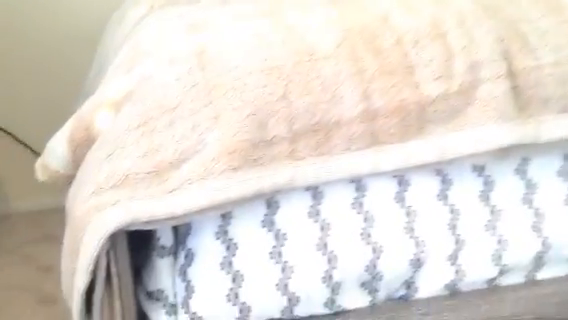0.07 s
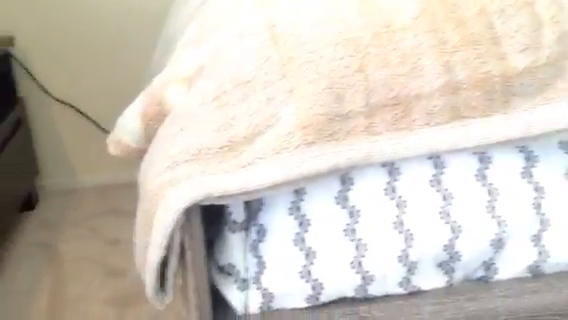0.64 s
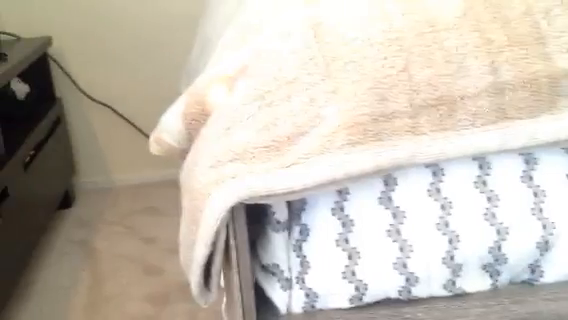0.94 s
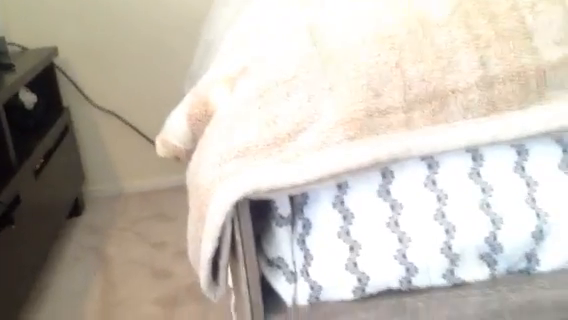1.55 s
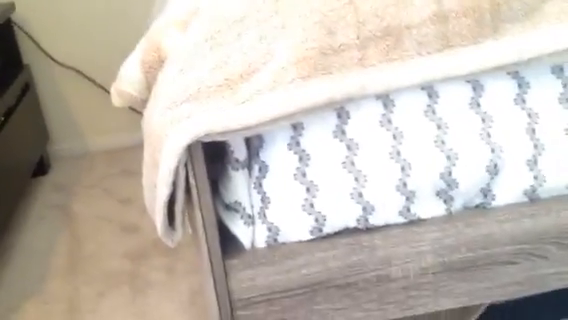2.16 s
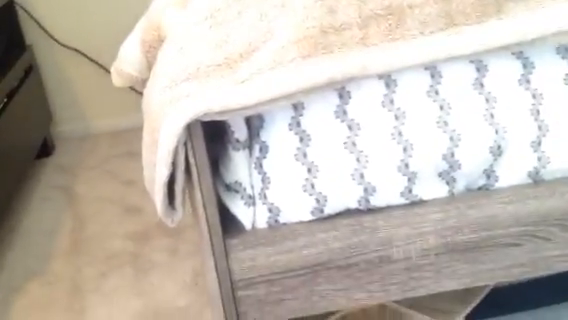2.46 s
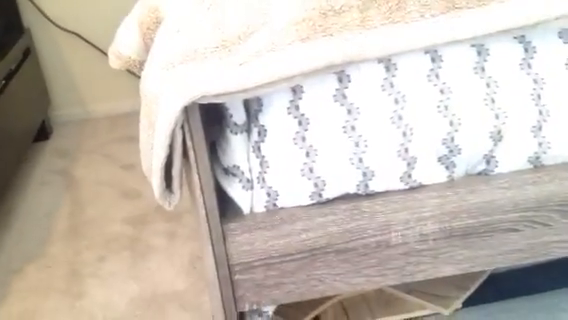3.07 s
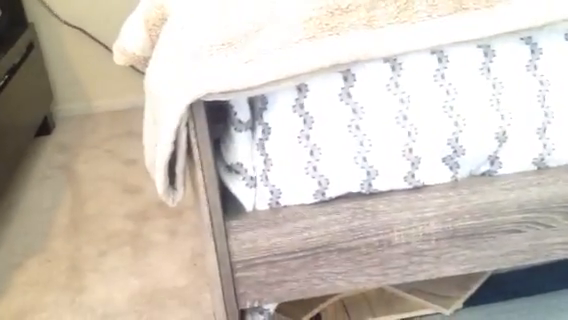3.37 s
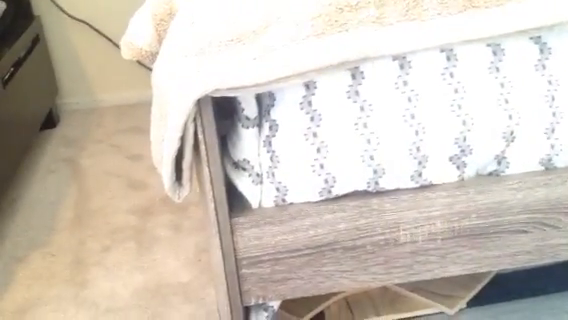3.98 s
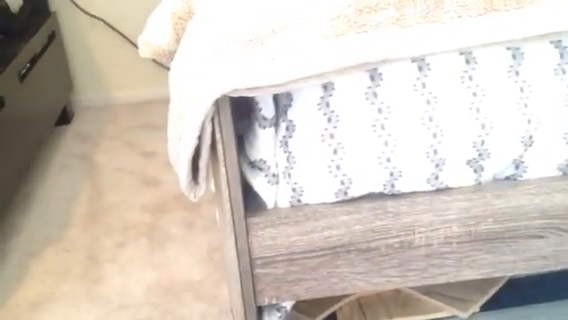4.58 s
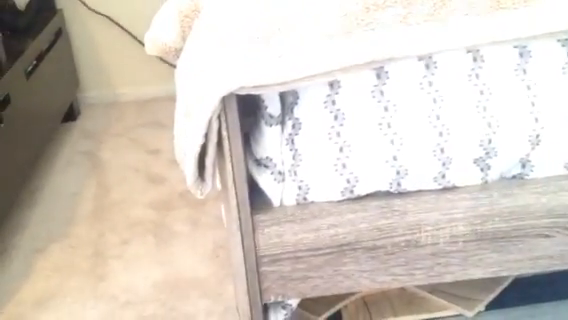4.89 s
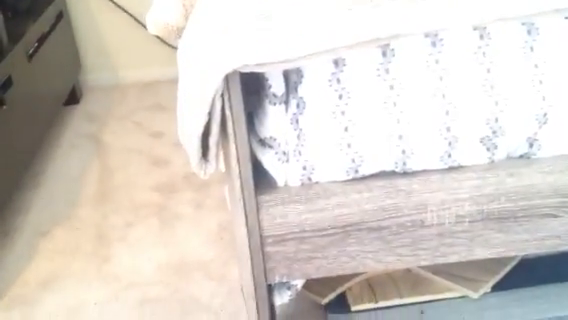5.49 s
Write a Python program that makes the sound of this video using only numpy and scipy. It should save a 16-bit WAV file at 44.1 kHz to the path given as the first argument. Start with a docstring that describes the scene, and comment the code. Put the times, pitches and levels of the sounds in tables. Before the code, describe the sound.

A hand shifts its grip on a phone in a quiet, carpeted bedroom, heard through the phone's own microphone. Soft fingertip thumps and light ticks come first. About two seconds in, a faint squeaky slide runs into one hard knock that chatters, scrapes and rings briefly. Another firm tap follows, then scattered lighter taps and slow rubbing over a faint, steady hiss.

```python
"""A hand handles a phone, heard through the phone's own microphone in a quiet, carpeted bedroom.
Skin sticks and slips over the hollow case in slow strokes, fingertips thump it, and the shell ticks.
One slide squeaks and rasps into a hard knock that chatters, scrapes on and leaves a hollow ring.
Under it all lies a steady bed of room tone and microphone hiss."""
import sys
import numpy as np
from scipy import signal
from scipy.fft import rfft, irfft
from scipy.io import wavfile

SR = 44100
rng = np.random.default_rng(int(sys.argv[2]) if len(sys.argv) > 2 else 0)


def persist_wave(psi):
    """Save psi, clipped to +-1, as 16-bit WAV."""
    counts = np.round(np.clip(psi, -1, 1) * 32767).astype(np.int16)
    wavfile.write(sys.argv[1], SR, np.atleast_2d(counts).T)


N = 244487
TIME = np.arange(N) / SR

# fingertip taps on the case
# (time [s], level [dB], pitch [Hz], swell [s], relative skin noise [dB], nail tick before trim [dB])
TAPS = [(0.4161, -34.5, 516, 0.0047, -11, -55.5), (0.433, -45, 320, 0.0058, 4, -63),
        (0.671, -52, 312, 0.0027, -8.5, -70), (0.7246, -41.5, 528, 0.0073, -7, -58),
        (0.8732, -35.5, 498, 0.0035, -13, -55), (0.971, -50, 343, 0.0029, -16, -80),
        (1.0179, -36, 450, 0.003, -11.5, -48), (1.1822, -39.5, 474, 0.0031, -11.5, -53),
        (1.2297, -34, 479, 0.0039, -16, -48), (1.239, -42, 466, 0.0078, -15, -56),
        (1.384, -55.5, 333, 0.0025, -16, -80), (1.5183, -41.5, 477.5, 0.009, 1, -36),
        (2.185, -28.5, 478, 0.0047, -9, -60), (2.226, -42, 496, 0.02, 6, -60),
        (2.5807, -25.5, 511, 0.0025, -18.5, -57), (2.5885, -31, 454, 0.0026, -24, -67),
        (2.732, -44.5, 502, 0.0071, -11, -72), (2.845, -40.5, 527, 0.0028, -22.5, -77),
        (2.915, -54.5, 794, 0.0072, 0.5, -56), (3.11, -55, 497, 0.005, -3, -59),
        (3.4474, -35, 548, .0078, -20, -56), (3.763, -48.5, 408, 0.0026, -2, -55),
        (4.411, -49, 564, 0.0032, -13, -66), (4.620, -40, 516, .005, -13, -70.5),
        (4.7688, -48, 536, 0.0031, -5.5, -50), (4.780, -41.5, 483, 0.0036, -6, -48),
        (4.949, -50, 555, 0.0076, -8.5, -51.5)]


def from_db(db):
    """Decibels to gain."""
    return 10 ** (np.asarray(db) / 20)


def response(colour, peaks=(), size=8192):
    """Unit-energy impulse response from an EQ curve and peaks (centre [Hz], width [Hz], boost [dB])."""
    hz = np.maximum(np.fft.rfftfreq(size, 1 / SR), 1)
    colour_hz, colour_db = np.transpose(colour)
    db = np.interp(np.log(hz), np.log(colour_hz), colour_db)
    for centre, width, boost in peaks:
        db = db + boost / (1 + (2 * (hz - centre) / width) ** 2)
    cepstrum = irfft(np.log(from_db(db)))[:size // 2]
    cepstrum[1:] *= 2   # minimum phase keeps attacks sharp
    impulse = irfft(np.exp(rfft(cepstrum, size)))[:size // 2]
    return impulse / np.linalg.norm(impulse)


def through(x, impulse):
    """Play x through an impulse response."""
    return signal.fftconvolve(x, impulse)[:len(x)]


def band(x, edges_hz, kind, order=2):
    """Butterworth filter."""
    return signal.sosfilt(signal.butter(order, edges_hz, kind, fs=SR, output="sos"), x)


def rms_one(x):
    """Scale to unit level."""
    return x / np.sqrt(np.mean(x ** 2) + 1e-20)


def add(track, s, sound):
    """Mix a sound in at time s."""
    start = round(s * SR)
    track[start:start + len(sound)] += sound[:N - start]


def burst(t60):
    """Half a second of noise that starts at once and dies away."""
    t = TIME[:SR // 2]
    return rng.standard_normal(len(t)) * from_db(-60 * t / t60)


def room_tone(level_db):
    """The room and the microphone's own hiss make a steady bed of coloured noise."""
    # EQ of the bed (frequency [Hz], level [dB])
    colour = [(15, -40), (25, -20), (37, -28.5), (91, -10), (129, -0.5), (245, 2), (989, -5.5),
              (1070, -10.5), (1190, -7), (1690, -9.5), (2040, -8.5), (4220, -11.5), (8030, -13),
              (8710, -21), (15300, -13.5)]
    return from_db(level_db) * through(rng.standard_normal(N), response(colour))


def rubbing(slips_per_s, slip_spread_db, smooth_share, grip_width_hz, grip_boost_db, band_trims_db):
    """Skin sticks and slips in tiny jerks that sound through the case and grip, in swelling strokes."""
    # strokes of the hand, levels before the band trims (firmest moment [s], swell [s], fade [s],
    # low drag [dB], hollow body [dB], friction hiss [dB], grip resonance [Hz])
    strokes = [(0.14, 0.058, 0.15, -90, -72, -71.5, 480), (0.295, 0.046, 0.063, -67, -74, -69, 293),
               (1.486, 0.025, 0.053, -61.5, -60.5, -59.5, 2430), (1.59, 0.034, 0.11, -63, -70, -87, 505),
               (1.74, 0.1, 0.096, -65.5, -65, -61.5, 808), (1.88, 0.037, 0.094, -53.5, -80, -81, 232),
               (1.97, 0.089, 0.11, -70, -65, -59.5, 1040), (2.11, 0.13, 0.26, -66, -60.5, -59, 1070),
               (2.345, 0.1, 0.071, -54, -45, -41.5, 1366), (2.47, 0.1, 0.086, -54.5, -55, -59.5, 418),
               (2.71, 0.17, 0.16, -65, -52.5, -63, 558), (2.851, 0.14, 0.11, -60, -61, -78.5, 450),
               (3.35, 0.18, 0.15, -63, -57.5, -68, 540), (3.66, 0.084, .1, -72, -66.5, -77.5, 542),
               (3.87, 0.091, 0.066, -54, -49, -65, 555), (4.425, 0.012, 0.2, -66.5, -55, -67.5, 590),
               (4.585, 0.096, 0.089, -60, -46, -57.5, 1000), (4.999, 0.072, 0.21, -73.5, -61.5, -84, 500),
               (5.25, 0.17, 0.12, -82, -53.5, -60, 835)]
    # EQ of the friction (frequency [Hz], level [dB])
    colour = [(40, -62.5), (180, -26.5), (230, -7.5), (340, -9), (520, -3), (600, -7.5), (670, -17.5),
              (1000, -13), (1300, -23), (2000, -20), (3400, -25), (4400, -23.5), (8700, -28.5),
              (12000, -49)]
    # resonances of the case (centre [Hz], width [Hz], boost [dB])
    case_peaks = [(231, 28, 10), (281, 26, 9), (425, 30, 10), (447, 6.6, 2), (507.4, 16, 8.5),
                  (550.6, 20, 8), (602, 110, 10), (767, 36, 8), (825.5, 32, 13), (1145, 13, 12),
                  (1360, 31, 11.5), (1530, 83, 9), (1638, 37, 10.5), (1960, 41, 3.5), (2046, 50, 7),
                  (2226, 45, 7), (2540, 70, 9.5), (4440, 760, 7)]
    edge_db, roundness = -10.5, 1.56   # level one swell before or one fade after the peak; 1 = pointed
    out, t = np.zeros(N), TIME[:SR]
    for s, swell, fade, *levels, grip_hz in strokes:
        slips = (rng.random(SR) < slips_per_s / SR) * rng.choice([-1, 1], SR)
        slip_sizes = from_db(slip_spread_db * np.minimum(rng.exponential(1, SR), 4))
        slips = rms_one(slips * slip_sizes)
        waver_db = 0.5 * rms_one(band(rng.standard_normal(SR), 45, "low"))   # pressure is never even
        friction = from_db(waver_db) * (slips + smooth_share * rng.standard_normal(SR))
        cavity = response(colour, case_peaks + [(grip_hz, grip_width_hz, grip_boost_db)])
        rub = through(friction, cavity)
        drag = band(rub, 350, "low", order=4)
        body = band(rub, [350, 1300], "band", order=3)
        hiss = band(rub, 1300, "high", order=4)
        start = max(s - 0.5, 0)
        from_peak = start + t - s
        pressure = from_db(edge_db * np.maximum(-from_peak / swell, from_peak / fade) ** roundness)
        for part, level, trim in zip((drag, body, hiss), levels, band_trims_db):
            add(out, start, pressure * from_db(level + trim) * rms_one(part))
    return out


def shell_ticks(trim_db, width_share):
    """The shell slips, alone or under a nail: a sudden crackle with one resonance set by the spot."""
    # lone ticks (time [s], level before trim [dB], pitch [Hz], t60 [s], resonance boost [dB])
    ticks = [(0.4308, -41, 4140, 0.02, 16), (0.671, -42, 8500, 0.012, 25), (0.738, -53, 4900, 0.17, 6),
             (2.6368, -39.5, 2380, 0.027, 8), (2.9112, -47, 1520, 0.078, 20.5),
             (3.2375, -52.5, 4100, 0.027, 0), (3.38, -55, 8000, 0.03, 16),
             (3.665, -59.5, 4640, 0.069, 18.5), (3.666, -54, 10200, .033, 27), (3.872, -47.5, 2880, .03, 1)]
    colour = [(60, -15.5), (300, -9.5), (1000, -2.5), (2200, 3), (3200, -3), (4500, 5), (6000, -9.5),
              (8700, -6), (10200, -28), (15000, -36.5)]   # (frequency [Hz], level [dB])
    lone_swell_s, nail_swell_s = 0.001, 0.0023
    nail_lead_s, nail_hz, nail_t60, nail_boost_db = 0.0056, 1900, 0.042, 4   # nail lands before the pad
    lone = [(*tick, lone_swell_s) for tick in ticks]
    nails = [(s - nail_lead_s, db, nail_hz, nail_t60, nail_boost_db, nail_swell_s) for s, *_, db in TAPS]
    out, t = np.zeros(N), TIME[:SR // 2]
    for s, db, hz, t60, boost_db, swell in lone + nails:
        envelope = np.minimum(t / swell, 1) * from_db(-60 * np.maximum(t - swell, 0) / t60)
        crackle = envelope * rng.standard_normal(len(t))
        spot = response(colour, [(hz, width_share * hz, boost_db)])
        add(out, s, from_db(db + trim_db) * through(crackle, spot))
    return band(out, 150, "high")


def bedroom(x, t60, first_wall_s):
    """Dense reflections of a small, soft room."""
    # EQ of the reflections (frequency [Hz], level [dB])
    colour = [(100, -8.5), (200, 5), (300, 7), (370, 2.5), (450, 2), (560, -4.5), (800, 2), (2000, -2.5),
              (5000, -6), (8500, -7.5), (12000, -5.5)]
    reflections = burst(t60) * (TIME[:SR // 2] > first_wall_s)
    tail = through(reflections, response(colour))
    return through(x, tail / np.linalg.norm(tail))


def fingertip_thumps(skin_t60, skin_trim_db):
    """A soft fingertip loads the case gradually, so its air cavity swells briefly; then the pad settles."""
    # EQ of the skin contact (frequency [Hz], level [dB])
    skin_colour = [(60, -38), (130, -19.5), (220, -4), (310, 3.5), (380, 0.5), (520, 3.5), (680, -9.5),
                   (800, 1), (880, -10.5), (960, -4), (1250, -12), (1900, -15), (3000, -24.5),
                   (12000, -46.5)]
    settle_delay_s, settle_db, settle_ratio = 0.01278, -16.5, 0.62   # a weaker, deeper bump
    out, t = np.zeros(N), TIME[:SR // 2]
    skin = response(skin_colour)

    def cavity(hz, swell):
        """A few cycles that swell and stop."""
        return (t / swell * np.exp(1 - t / swell)) ** 2 * np.sin(2 * np.pi * hz * t)

    for s, db, hz, swell, skin_db, _ in TAPS:
        scuff = from_db(skin_db + skin_trim_db) * through(burst(skin_t60), skin)
        add(out, s, from_db(db) * (cavity(hz, swell) + scuff))
        add(out, s + settle_delay_s, from_db(db + settle_db) * cavity(settle_ratio * hz, swell=0.004))
    return band(out, 120, "high", order=4)


def slide(start_s, firm_s, end_s, squeak_hz, sag_hz_per_s, ragged_hz):
    """Pressed skin gives a faint, ragged, slowly falling squeak while the shell rasps ever louder."""
    pitch = squeak_hz - sag_hz_per_s * np.clip(TIME - start_s, 0, 1)
    phase = 2 * np.pi * np.cumsum(pitch) / SR
    flutter = band(rng.standard_normal((2, N)), ragged_hz, "low")
    squeak = rms_one(flutter[0] * np.cos(phase) + flutter[1] * np.sin(phase))
    colour = [(60, -47), (500, -2), (1300, -20), (2300, 3), (3400, -5), (4400, -0.5), (6500, -7.5),
              (8000, -2.5), (10200, -24.5), (15000, -15)]   # (frequency [Hz], level [dB])
    rasp = through(rng.standard_normal(N), response(colour, peaks=[(4270, 510, 12)]))
    squeak_db = np.interp(TIME, [start_s, firm_s], [-66.5, -61])
    rasp_db = np.interp(TIME, [start_s, firm_s], [-95, -53])
    touching = np.clip(np.minimum(TIME - start_s, end_s - TIME) / 0.0046, 0, 1)
    return touching * (from_db(squeak_db) * squeak + from_db(rasp_db) * rasp)


def knock():
    """One hard contact on the shell, then smaller rebounds, the last with a fine hiss."""
    # the hit and its chatter (time [s], level [dB], t60 [s], relative top hiss [dB])
    contacts = [(2.1825, -18, 0.022, -19), (2.1878, -27.5, 0.039, -22), (2.1921, -25, 0.021, -23.5),
                (2.2135, -34, 0.02, -25.5), (2.2204, -34, 0.087, -25.5), (2.235, -37.5, 0.22, -2)]
    # EQ of the struck shell (frequency [Hz], level [dB])
    colour = [(60, -45.5), (125, -8.5), (250, -12.5), (480, 3), (720, -6.5), (950, -3), (1270, -11.5),
              (1900, 1), (3200, -8), (4700, 1), (5600, -8), (7000, -7), (10300, -29.5), (15000, -37.5)]
    # resonances of the struck shell (centre [Hz], width [Hz], boost [dB])
    peaks = [(1980, 150, 1), (2728, 34, 2), (4550, 80, -3.5), (4630, 97, 11), (4880, 140, -1),
             (6435, 500, 2)]
    out, shell = np.zeros(N), response(colour, peaks)
    for s, db, t60, hiss_db in contacts:
        hiss = band(burst(t60), [9000, 13500], "band")
        clack = through(burst(t60), shell)
        add(out, s, from_db(db) * (clack + from_db(hiss_db) * hiss))
    return out


def shell_crack(s, rise_s):
    """The first hard contact sets the stiff shell ringing, bright and short."""
    # modes of the shell (frequency [Hz], level [dB], t60 [s])
    modes = [(1110, -33, 0.028), (2084, -27, .06), (2487, -29, 0.11), (4050, -26.5, 0.011),
             (4550, -15, .018), (5030, -23, .022), (5580, -19.5, .008), (6816, -18, 0.0056),
             (7800, -12.5, 0.0019), (8380, -21, 0.015), (9080, -20.5, 0.0084)]
    out, t = np.zeros(N), TIME[:SR // 4]
    for k, (hz, db, t60) in enumerate(modes):
        envelope = np.minimum(t / rise_s, 1) * from_db(db - 60 * t / t60)
        add(out, s, (-1) ** k * envelope * np.sin(2 * np.pi * hz * t))
    return out


def jolt(s, db, hz, decay_s):
    """The knock shakes the whole microphone in one slow wobble."""
    t = np.maximum(TIME - s, 0)
    return from_db(db) * np.sin(2 * np.pi * hz * t) * np.exp(-t / decay_s)


def hollow_ring(unevenness_db):
    """Each blow strikes the same long modes with strengths of its own; a heavy push favours the deepest."""
    # blows that start the ring (time [s], level [dB], extra on the deepest modes [dB], swell [s])
    blows = [(2.184, -39.5, -11.5, 0.0027), (2.227, -46, -0.5, 0.0039), (2.347, -44.5, 5.5, 0.0094),
             (2.791, -63.5, 15, 0.049)]
    # hollow modes (frequency [Hz], relative level [dB], t60 [s])
    modes = [(160.8, -14, 0.16), (228.8, 5.5, 0.39), (315, -18.5, 0.44), (416, -4.5, .25), (433, -7.5, 1.4),
             (440, -7.5, 0.21), (506, -7.5, 0.12), (559, 0.5, 0.45), (626, -5, 0.75), (770, -12, .7),
             (819, -11.5, .5), (1166, -11.5, .4), (1353, -11.5, 0.19), (1570, -11, 0.33), (1596, -4, 0.41),
             (2110, -4, 0.21), (2320, -19.5, .4), (2220, -18.5, .4), (2590, -10, 0.32), (4000, -15.5, .4),
             (4420, -12.5, .35), (4770, -10, .25), (4760, -14, .25), (5050, -9, .25), (4870, -14.5, 0.18)]
    out, t = np.zeros(N), TIME[:SR]
    hz, mode_db, t60 = np.transpose(modes)[:, :, None]
    for s, db, deep_db, swell in blows:
        scatter_db = unevenness_db * rng.standard_normal(hz.shape)
        strength = from_db(db + mode_db + deep_db * (hz < 260) + scatter_db)
        phase = 2 * np.pi * rng.random(hz.shape)
        partials = strength * from_db(-60 * t / t60) * np.sin(2 * np.pi * hz * t + phase)
        add(out, s, partials.sum(axis=0) * (1 - np.exp(-t / swell)))
    return band(out, 130, "high", order=4)


def scene():
    """Close-up hand sounds over a steady hiss, with a little room on the hits."""
    hard = shell_crack(2.1827, rise_s=0.0011) + knock() + shell_ticks(trim_db=-6.5, width_share=0.24)
    hard += from_db(-7) * bedroom(hard, t60=0.22, first_wall_s=0.0033)
    soft = fingertip_thumps(skin_t60=0.055, skin_trim_db=4)
    soft += from_db(-7.5) * bedroom(soft, t60=0.22, first_wall_s=0.0046)
    rub = rubbing(slips_per_s=900, slip_spread_db=1.5, smooth_share=0.88,
                  grip_width_hz=36, grip_boost_db=6.5, band_trims_db=(-1, -1.32, -0.76))
    rub += slide(start_s=1.9, firm_s=2.077, end_s=2.185, squeak_hz=1118, sag_hz_per_s=240, ragged_hz=48)
    bed = room_tone(level_db=-70.5)
    ring = hollow_ring(unevenness_db=1)
    wobble = jolt(2.183, db=-68, hz=30, decay_s=0.02)
    return (hard + soft + rub + bed + ring + wobble)[None]


def record(dry):
    """A steep low-pass takes off the very top."""
    cutoff_hz = 15400
    return signal.sosfilt(signal.ellip(12, 0.1, 80, cutoff_hz, fs=SR, output="sos"), dry)


dry = scene()
out = record(dry)
persist_wave(out)
```